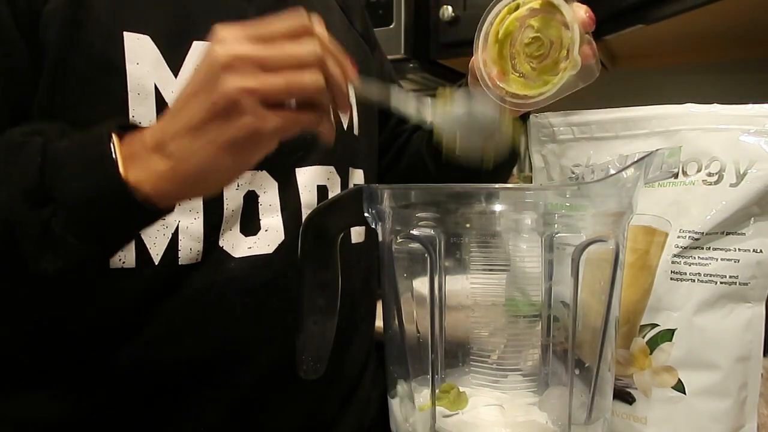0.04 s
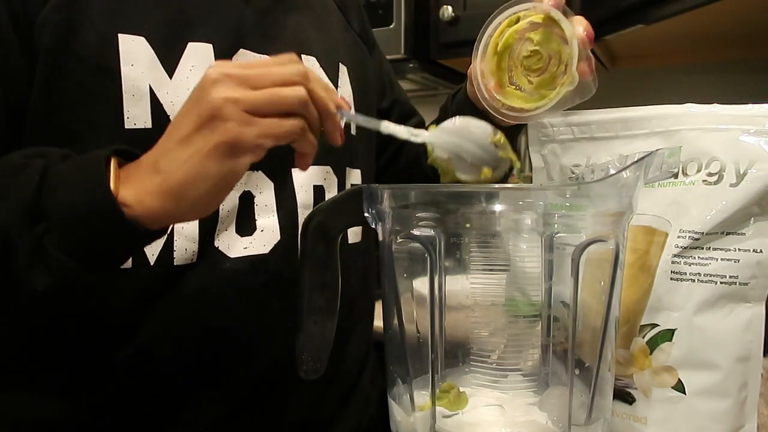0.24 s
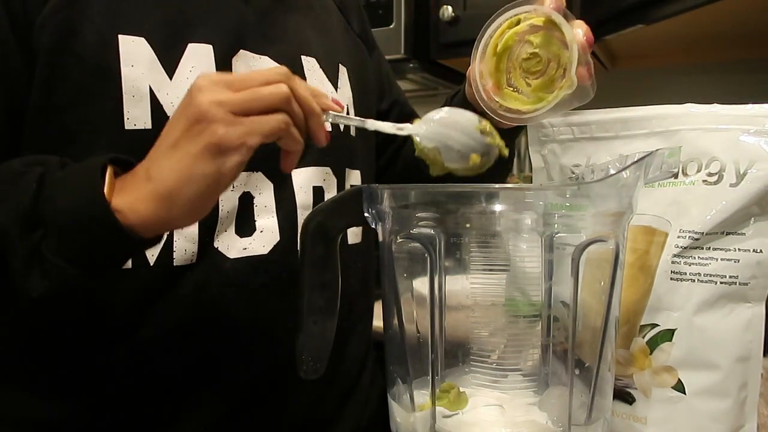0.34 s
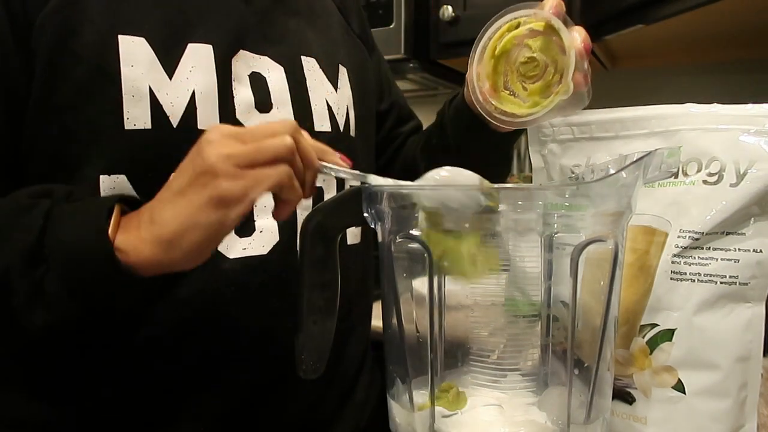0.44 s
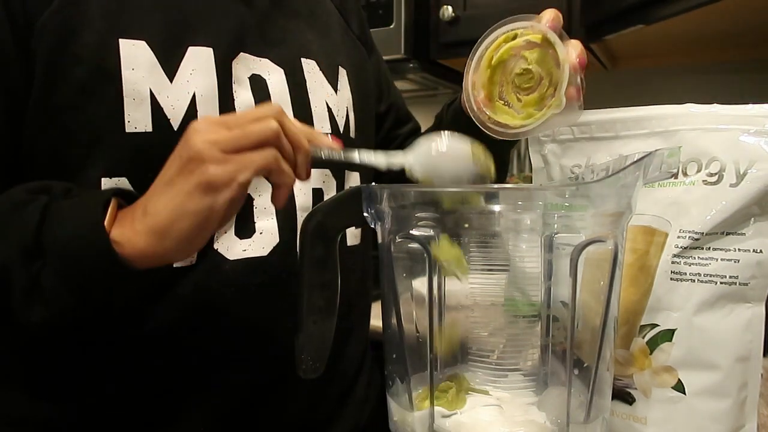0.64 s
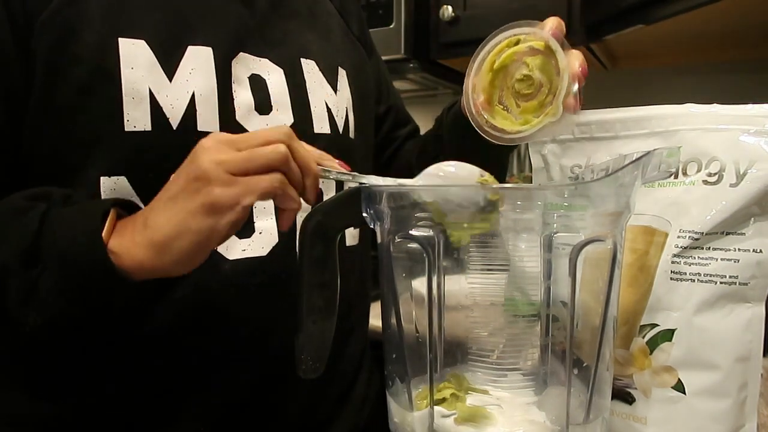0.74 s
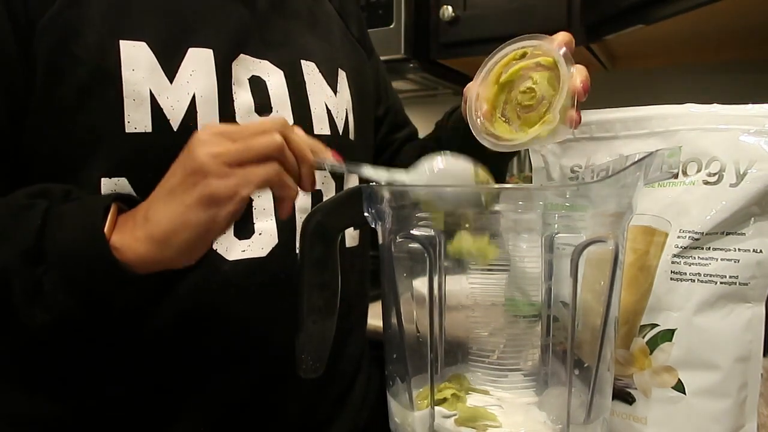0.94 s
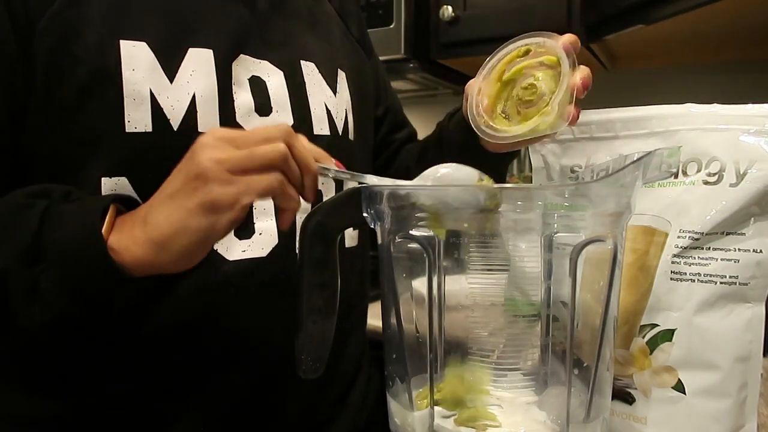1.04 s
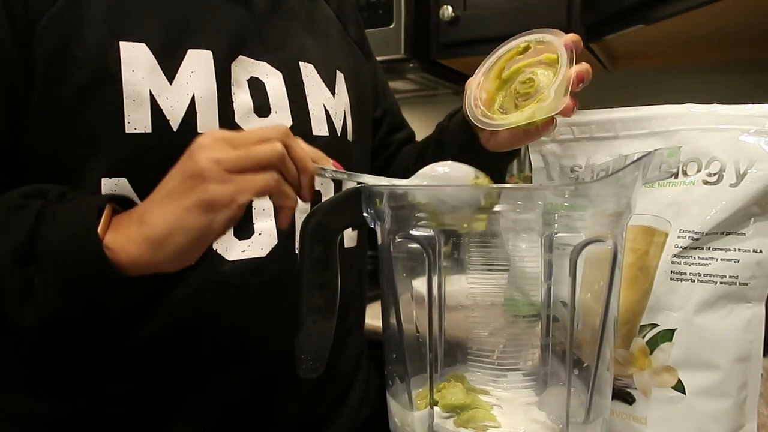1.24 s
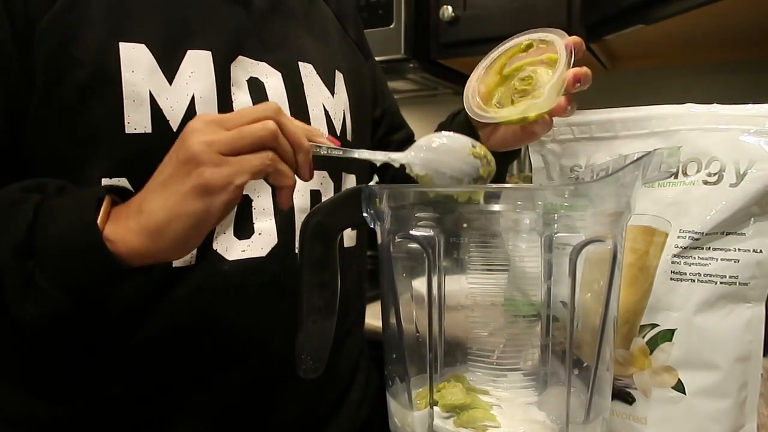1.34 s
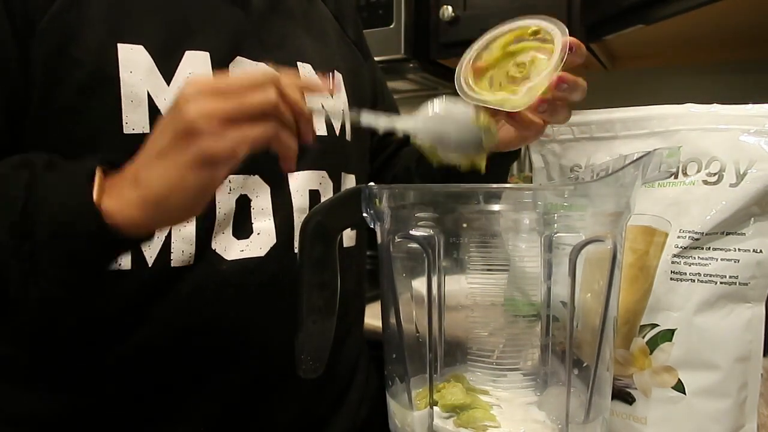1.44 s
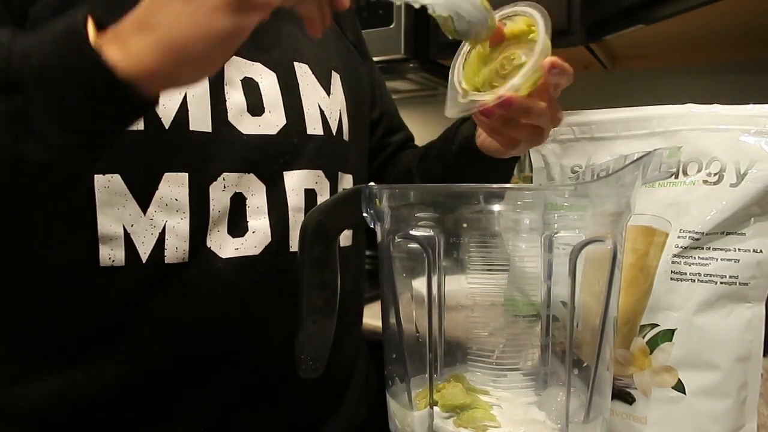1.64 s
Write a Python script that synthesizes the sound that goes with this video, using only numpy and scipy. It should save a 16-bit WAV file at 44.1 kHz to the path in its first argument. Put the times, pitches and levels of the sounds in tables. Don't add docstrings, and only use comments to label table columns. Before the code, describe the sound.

A spoon rapping a thick plastic blender jar six times after one sharp click on a cup

```python
import sys
import numpy as np
from scipy import signal
from scipy.fft import rfft, irfft
from scipy.io import wavfile

SR = 44100
rng = np.random.default_rng(int(sys.argv[2]) if len(sys.argv) > 2 else 0)


def master(y):
    cut = np.clip(np.atleast_2d(y).T, -1, 1)
    pcm = np.round(cut * 32767)
    wavfile.write(sys.argv[1], SR, pcm.astype(np.int16))


def attenuation_scalar(level_db):
    decades = np.asarray(level_db, float) / 20
    return 10 ** decades


N = 74970


def curve(points, hz):
    f, value = np.transpose(points)
    return np.interp(np.log(hz + 1), np.log(f), value)


def coloured(points, size):
    hz = np.fft.rfftfreq(size, 1 / SR)
    x = irfft(rfft(rng.standard_normal(size)) * attenuation_scalar(curve(points, hz)), size)
    return x / np.sqrt(np.mean(x ** 2))


def add(mix, s, sound):
    part = mix[round(s * SR):][:len(sound)]
    part += sound[:len(part)]


def ring(modes, rise_s, pitch=1, spread_db=0, travel_s=0, focus_s=0):
    t = np.arange(SR // 2) / SR
    out = np.zeros(len(t))
    for hz, db, t60 in modes:
        level_luck, pitch_luck = rng.standard_normal(2)
        level = attenuation_scalar(db + spread_db * level_luck - 60 * t / t60)
        swing = hz * pitch * (1 + 0.0091 * pitch_luck) * (t - focus_s)
        bending_lag = 2 * travel_s * np.sqrt(hz * 1500)
        out += level * np.cos(2 * np.pi * (swing - bending_lag))
    return out * (1 - np.exp(-(t / rise_s) ** 2))


def crack(colour, db, t60):
    t = np.arange(SR // 2) / SR
    return attenuation_scalar(db - 60 * t / t60) * np.minimum(t / .0012, 1) * coloured(colour, len(t))


def pulse(colour, db, size=512):
    gain = attenuation_scalar(curve(colour, np.fft.rfftfreq(size, 1 / SR)))
    x = np.roll(irfft(gain), size // 4)[:size // 2] * np.hanning(size // 2)
    return attenuation_scalar(db) * x / np.linalg.norm(x)


# frequency in Hz, level in dB per Hz.
ROOM_AIR = [(20, -26), (60, -8.5), (170, -3), (500, -23), (900, -23), (2200, -23), (4000, -34.5),
            (8000, -47), (16000, -77.5)]
# frequency in Hz, level in dB per Hz.
EARLIER_SCRAPE = [(120, -17), (300, 7.5), (640, -5.5), (1000, -8.5), (2000, -8), (4000, -13), (8000, -30),
                  (16000, -60.5)]
# frequency in Hz, side minus mid in dB.
BACKGROUND_WIDTH = [(60, -33), (500, -6), (3000, -5), (8000, 9.5), (14000, -8.5)]
# frequency in Hz, level in dB.
FRIDGE_HUM = [(60, -57.5), (120, -57), (180, -85.5), (290, -66.5)]


def background():
    t = np.arange(N) / SR

    def floor():
        return attenuation_scalar(-58) * coloured(ROOM_AIR, N) + attenuation_scalar(-53.5 - 60 * t / 4.5) * coloured(EARLIER_SCRAPE, N)

    mid, other = floor(), floor()
    side = irfft(rfft(other) * attenuation_scalar(curve(BACKGROUND_WIDTH, np.fft.rfftfreq(N, 1 / SR))), N)
    for hz, db in FRIDGE_HUM:
        wobble_db = 2.5 * np.sin(2 * np.pi * (1.4 * t + rng.random()))
        mid += attenuation_scalar(db + wobble_db) * np.sin(2 * np.pi * (hz * t + rng.random()))
    return np.array([mid + side, mid - side])


# frequency in Hz, t60 in seconds.
KITCHEN_DECAY = [(100, 1), (260, .4), (700, 0.82), (1840, 0.38), (4850, 0.36), (8000, 0.31), (11000, 0.075)]
# delay in seconds, left level in dB, right level in dB.
EARLY_ECHOES = [(.0035, -24.5, -28.5), (.0072, -18, -13.5), (.0105, -25.5, -21), (.017, -34.5, -24),
                (.026, -43, -19)]


def kitchen(x):
    room_db, likeness = -12.5, 0.99
    a, b = rng.standard_normal((2, SR))
    taps = np.array([a, likeness * a + np.sqrt(1 - likeness ** 2) * b])
    hz, t, z = signal.stft(taps, SR, nperseg=256)
    decay = attenuation_scalar(-60 * t / curve(KITCHEN_DECAY, hz)[:, None])
    tail = signal.istft(z * decay, SR, nperseg=256)[1][:, :SR]
    tail = tail * np.clip(np.arange(SR) / SR / 0.0085 - .2, 0, 1)
    tail = attenuation_scalar(room_db) * tail / np.linalg.norm(tail[0])
    for k, (s, left_db, right_db) in enumerate(EARLY_ECHOES):
        tail[:, round(s * SR)] += (-1) ** k * attenuation_scalar([left_db, right_db])
    return signal.fftconvolve(x[None], tail, axes=1)[:, :N]


# start in seconds, level in dB, frequency in Hz, t60 in seconds.
PASTE_THUMPS = [
    (0.562, -41.5, 190, .06),
    (0.576, -16.5, 147.8, 0.11),
    (0.621, -32.5, 120, .1),
    (0.736, -25.5, 102.4, 0.13),
    (0.889, -25, 107, 0.1),
    (1.061, -33.5, 125, 0.13),
    (1.198, -29, 98, 0.18),
    (1.352, -32.5, 101.9, 0.17),
    (1.43, -33, 164.3, 0.17),
]
# start in seconds, level in dB, frequency in Hz, t60 in seconds.
CUP_NUDGES = [
    (0.14, -44.5, 2030, 0.027),
    (.148, -35, 477, 0.072),
    (.151, -24, 603, 0.02),
    (.167, -29, 600, 0.022),
    (0.185, -27.5, 486, 0.025),
    (0.201, -32.5, 526, 0.013),
]
# start in seconds, level in dB, frequency in Hz, t60 in seconds.
STICKY_TICKS = [
    (0.7704, -72.5, 5500, 0.0051),
    (.776, -53, 10000, 0.0017),
    (.8, -53, 4900, 0.036),
    (0.807, -75, 4000, 0.013),
    (.823, -45, 5200, 0.0068),
    (1.125, -72, 7000, 0.0039),
]


def handling():
    out = np.zeros(N)
    for s, db, hz, t60 in [*PASTE_THUMPS, *CUP_NUDGES, *STICKY_TICKS]:
        add(out, s, ring([(hz, db, t60), (hz * 1.22, db - 10, t60 * .6)], rise_s=.8 / hz))
    return out


# frequency in Hz, level in dB.
SCUFF_COLOUR = [(200, -19.5), (500, -1.5), (1000, -6), (1600, -12.5), (2500, -21), (6000, -37),
                (10000, -69.5)]


def scuff():
    out = np.zeros(N)
    add(out, .145, crack(SCUFF_COLOUR, -43, t60=0.16))
    return out


SNAP_S, SNAP_RISE_S = .2245, 0.0014
# frequency in Hz, level in dB, t60 in seconds.
CUP_MODES = [(1640, -5, 0.006), (1930, -5, 0.018), (2070, -7, 0.013), (2350, -12, 0.0077),
             (2590, -8, 0.016), (2750, -11, 0.014), (3280, -5, .008), (3690, -6.5, .009),
             (4300, -18.5, .008), (4960, -31, 0.01), (5460, -29.5, .005), (6050, -30, 0.002),
             (9970, -46, 0.024)]
# frequency in Hz, level in dB.
SNAP_EDGE = [(500, -53), (1500, 5.5), (2500, -16), (4000, -3), (6500, -6), (9000, -16.5), (13000, -27),
             (19000, -40.5)]
# frequency in Hz, level in dB.
CUP_SIDEWAYS = [(700, -28.5), (1450, -28), (1850, 2.5), (2600, -13.5), (4000, -3.5), (6000, -8),
                (8000, -17.5), (10000, -58)]


def cup_snap(direct, sideways):
    snap = ring(CUP_MODES, SNAP_RISE_S, travel_s=.0014) + crack(SNAP_EDGE, -8.5, t60=0.0083)
    add(direct, SNAP_S, attenuation_scalar(9) * snap)
    add(sideways, SNAP_S, pulse(CUP_SIDEWAYS, 5))


# frequency in Hz, level in dB, t60 in seconds.
SNAP_LOWS = [(139, -14.5, 0.012), (565, -29.5, .008), (1020, -7, 0.021)]


def snap_lows():
    out = np.zeros(N)
    add(out, SNAP_S, ring(SNAP_LOWS, SNAP_RISE_S, focus_s=.0015))
    return out


# start in seconds, blow in dB, boom in dB above usual,
# boom pitch as a factor, edge noise in dB above usual.
KNOCKS_ON_JAR = [
    (0.5361, -2, 1.5, 1.02, 6.5),
    (0.7, -9.5, 3, 1.086, 2),
    (0.8427, -3.5, 1.5, 1.001, 3.5),
    (1.0039, -2, 1, 1.032, 4.5),
    (1.1611, -5, -0.5, 1.043, 2),
    (1.3171, -3.5, 1, 1.055, 6),
]
# frequency in Hz, level in dB, t60 in seconds.
JAR_WALL = [(1135, -29.5, 0.082), (1243, -16.5, 0.07), (1457, -13.5, .03), (1474, -8, 0.052),
            (1553, -13.5, 0.04), (1606, -1.5, 0.018), (1775, -9, .02), (2016, -16.5, 0.028),
            (2241, -13, 0.038), (2475, -8.5, 0.018), (2570, -4, 0.0055), (2766, -15, 0.015),
            (2915, -15, .02), (3365, -23, 0.015)]
# frequency in Hz, level in dB, t60 in seconds.
JAR_BOOM = [(161, -20, 0.086), (198.3, -15, 0.13), (335.7, -17, 0.087), (447.5, -12.5, 0.072),
            (600, -31, 0.077), (870, -27.5, .05)]
# frequency in Hz, level in dB.
KNOCK_EDGE = [(300, -7.5), (800, -10), (1500, -6.5), (3000, -9), (4200, -26.5), (6000, -31.5), (8001, -45),
              (14000, -65)]
# frequency in Hz, level in dB.
JAR_SIDEWAYS = [(250, -22.5), (950, -18.5), (1350, -2.5), (2000, -0.5), (3000, -9), (3700, -27.5),
                (7500, -37.5), (10000, -84)]
# frequency in Hz, level in dB.
COUNTER_COLOUR = [(20, -21), (45, 3), (100, 5.5), (160, 0.5), (300, -39.5), (1000, -92)]


def jar_knocks(direct, sideways, counter):
    for s, db, boom_db, pitch, edge_db in KNOCKS_ON_JAR:
        wall = ring(JAR_WALL, rise_s=0.0015, spread_db=3.0, travel_s=.0021)
        boom = attenuation_scalar(boom_db) * ring(JAR_BOOM, 0.0026, pitch, spread_db=2.5, focus_s=.003)
        edge = crack(KNOCK_EDGE, edge_db - 16.5, t60=0.03)
        add(direct, s, attenuation_scalar(db - 0.5) * (edge - wall - boom))
        add(sideways, s, pulse(JAR_SIDEWAYS, db + 6))
        add(counter, s, crack(COUNTER_COLOUR, db - 37, t60=0.6))


def spoon():
    direct, sideways, counter = np.zeros((3, N))
    cup_snap(direct, sideways)
    jar_knocks(direct, sideways, counter)
    direct = signal.sosfilt(signal.butter(2, 120, "high", fs=SR, output="sos"), direct)
    return direct + counter, attenuation_scalar(-4) * direct + sideways


def scene():
    struck, sent = spoon()
    small = handling() + scuff()
    close = struck + snap_lows() + small
    left, right = np.array([np.roll(close, 1), close]) + kitchen(sent + small)
    upper = signal.lfilter(*signal.butter(1, 300, "high", fs=SR), left)
    left = left - (1 - attenuation_scalar(-1.3)) * upper
    return np.array([left, right]) + background()


def roll_off(x):
    return signal.sosfilt(signal.butter(12, 18500, fs=SR, output="sos"), x)


def record(dry):
    ceiling, knee = .99, 12
    squashed = dry / (1 + abs(dry / ceiling) ** knee) ** (1 / knee)
    return roll_off(squashed)


dry = scene()
out = record(dry)
master(out)
```